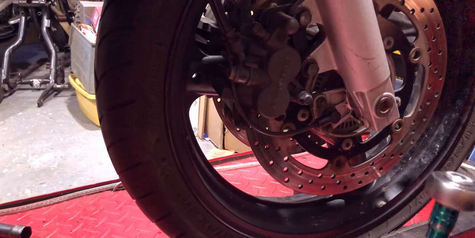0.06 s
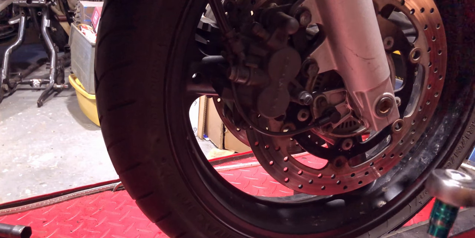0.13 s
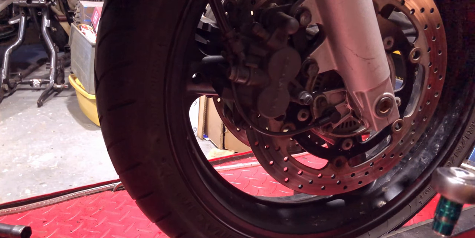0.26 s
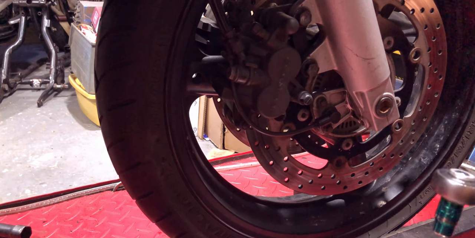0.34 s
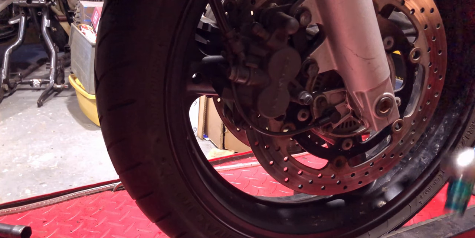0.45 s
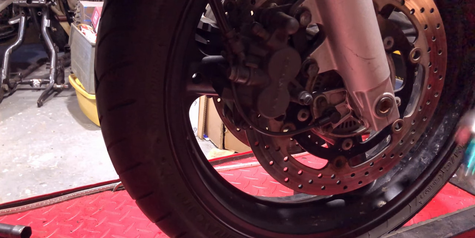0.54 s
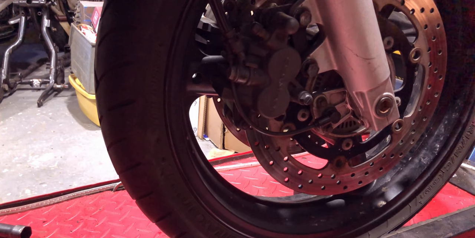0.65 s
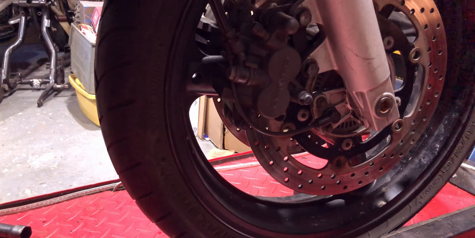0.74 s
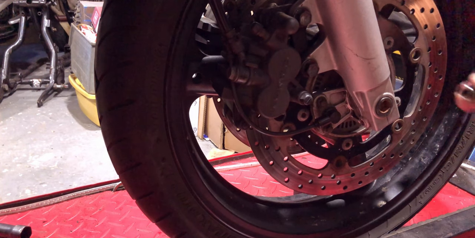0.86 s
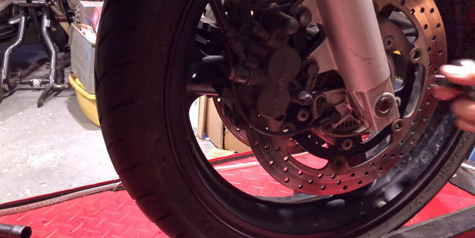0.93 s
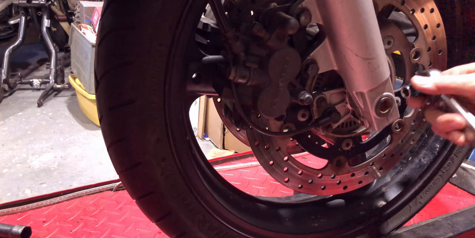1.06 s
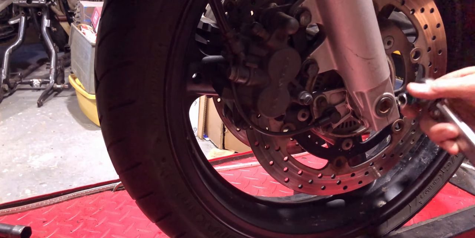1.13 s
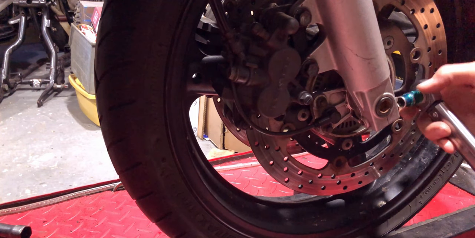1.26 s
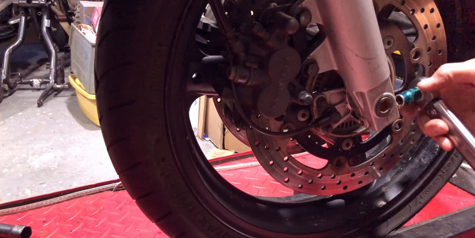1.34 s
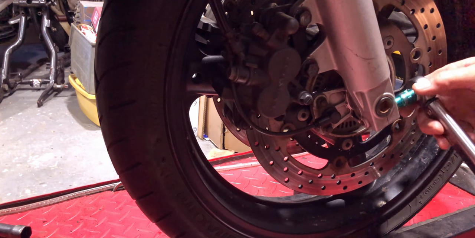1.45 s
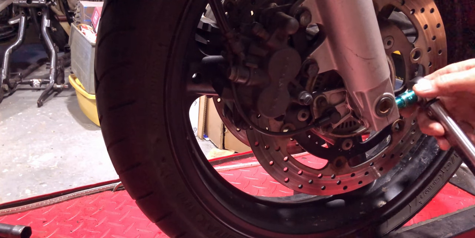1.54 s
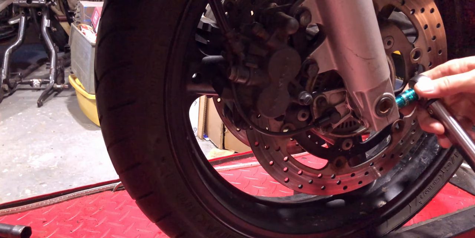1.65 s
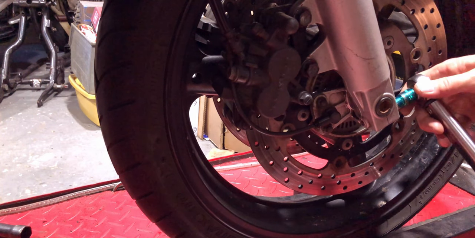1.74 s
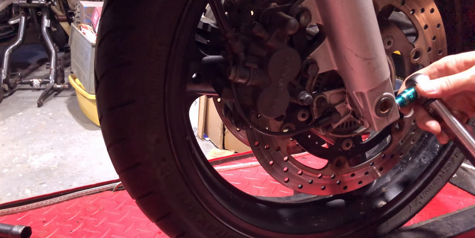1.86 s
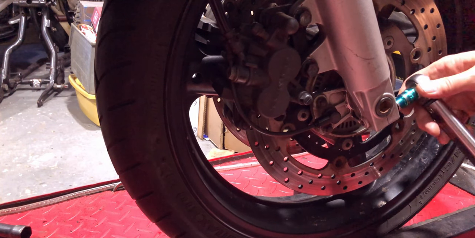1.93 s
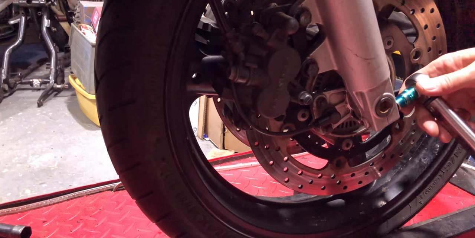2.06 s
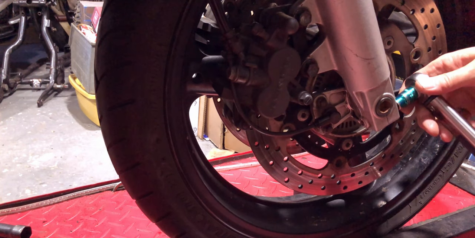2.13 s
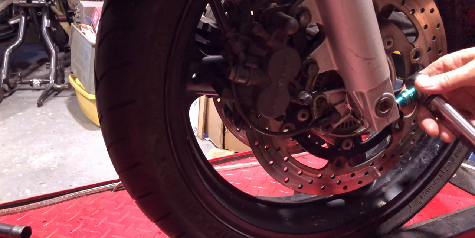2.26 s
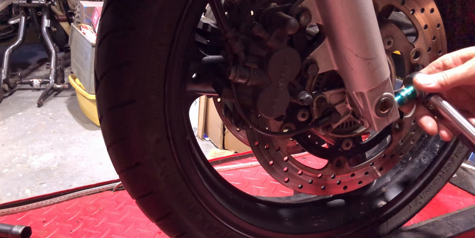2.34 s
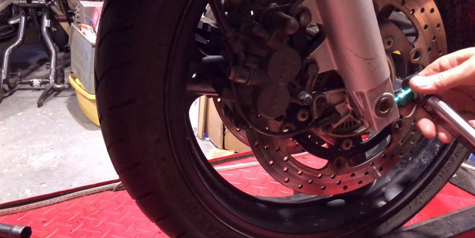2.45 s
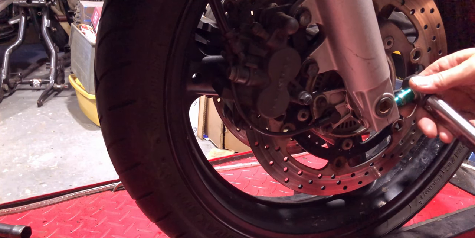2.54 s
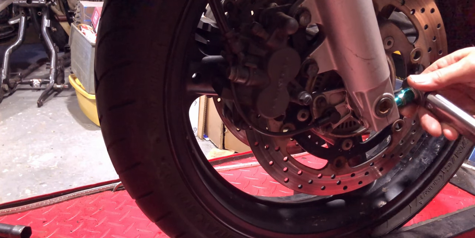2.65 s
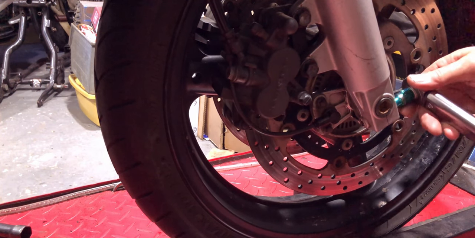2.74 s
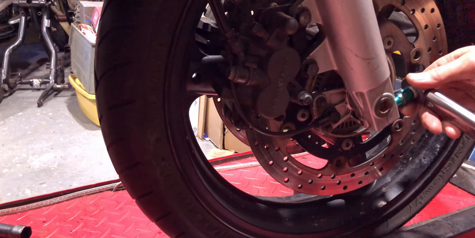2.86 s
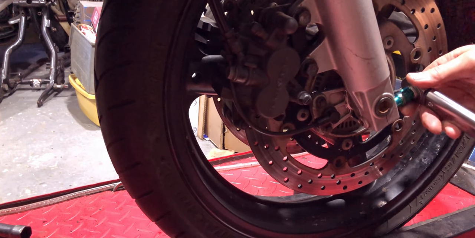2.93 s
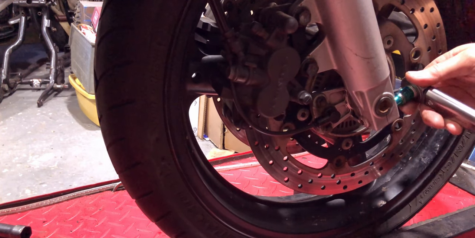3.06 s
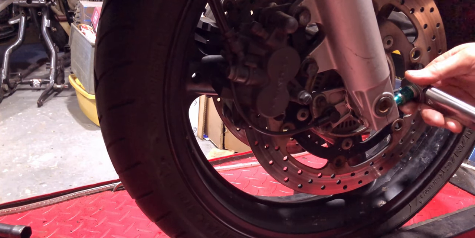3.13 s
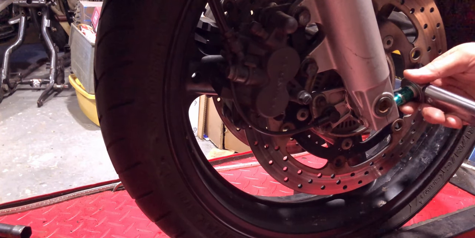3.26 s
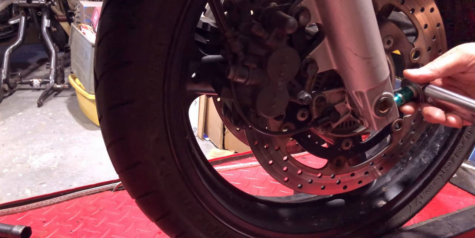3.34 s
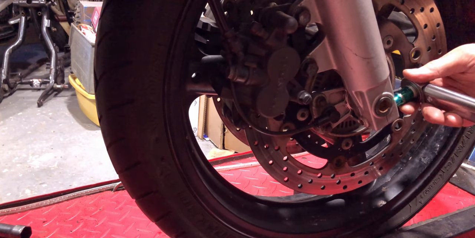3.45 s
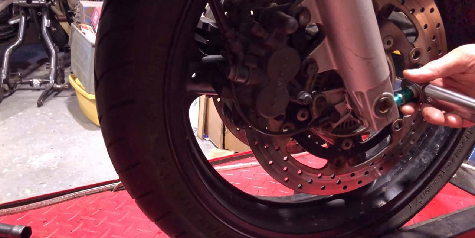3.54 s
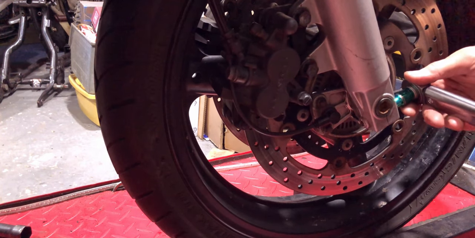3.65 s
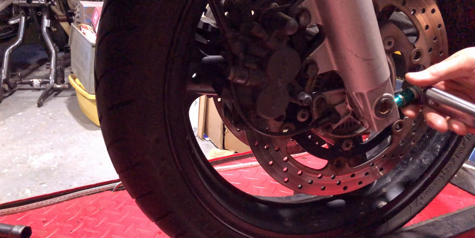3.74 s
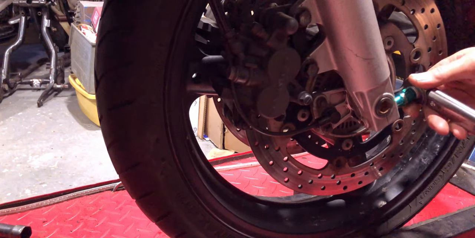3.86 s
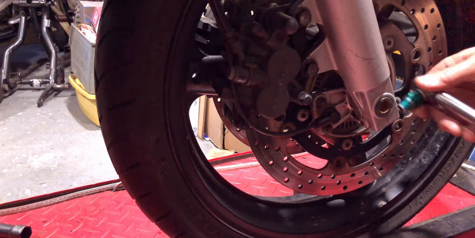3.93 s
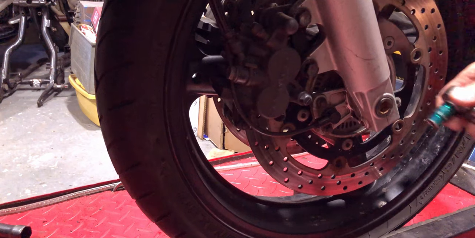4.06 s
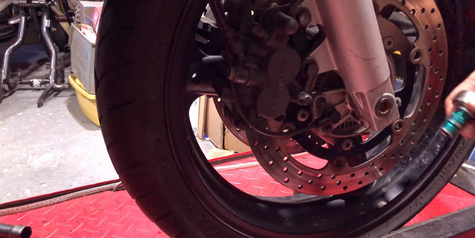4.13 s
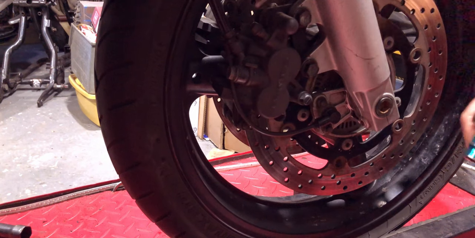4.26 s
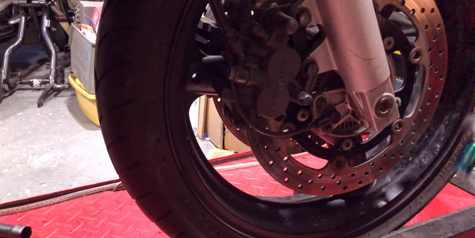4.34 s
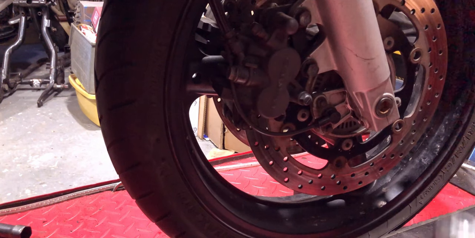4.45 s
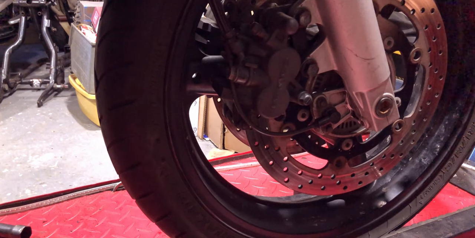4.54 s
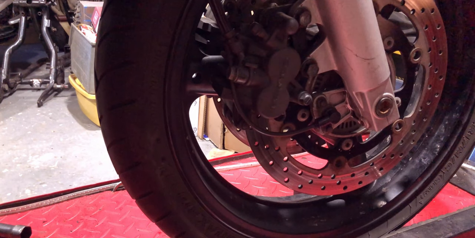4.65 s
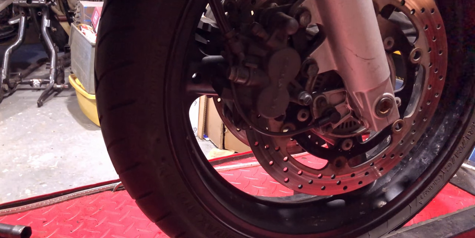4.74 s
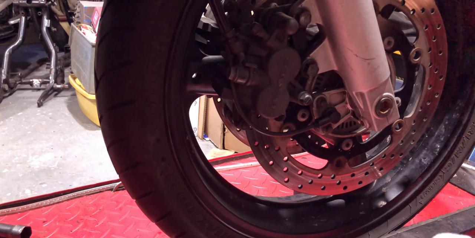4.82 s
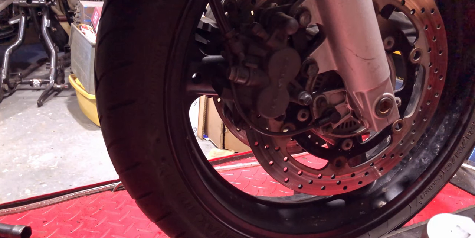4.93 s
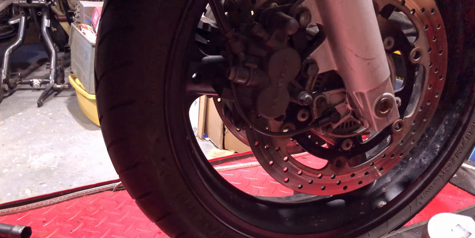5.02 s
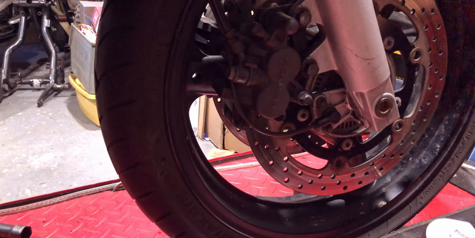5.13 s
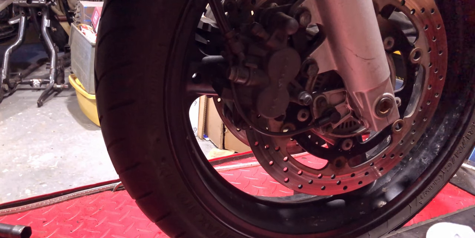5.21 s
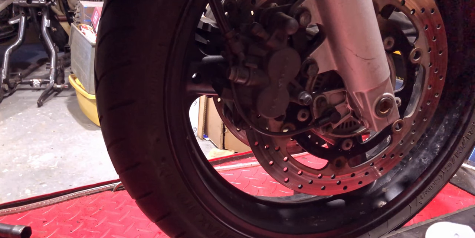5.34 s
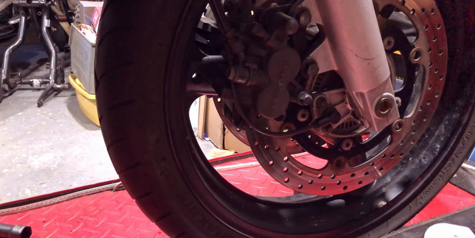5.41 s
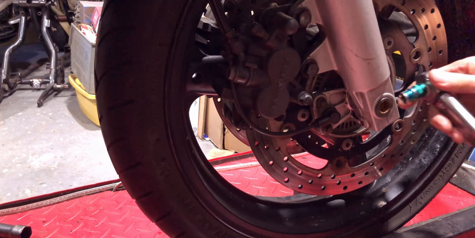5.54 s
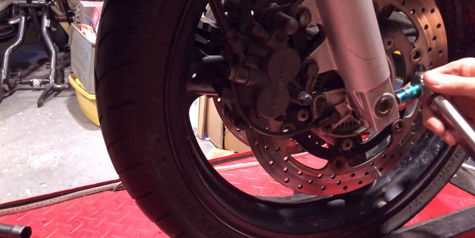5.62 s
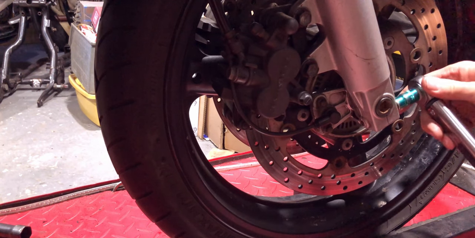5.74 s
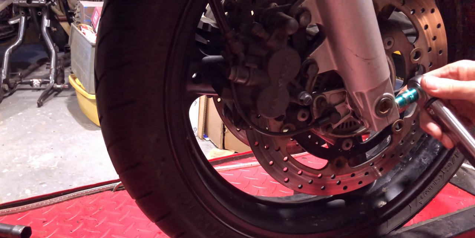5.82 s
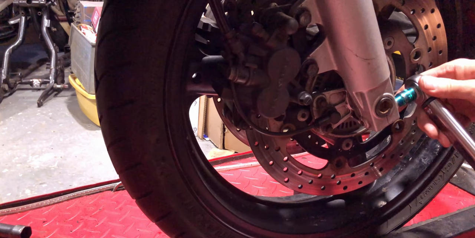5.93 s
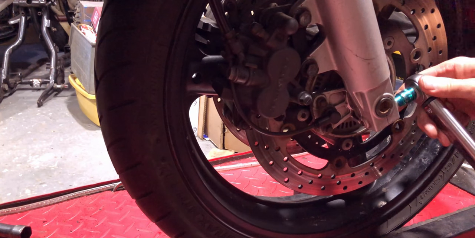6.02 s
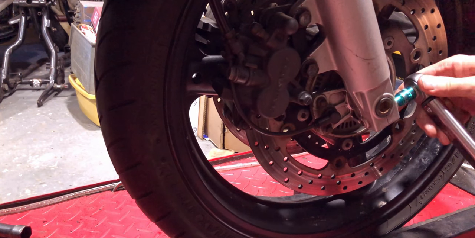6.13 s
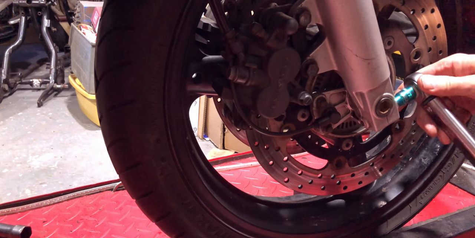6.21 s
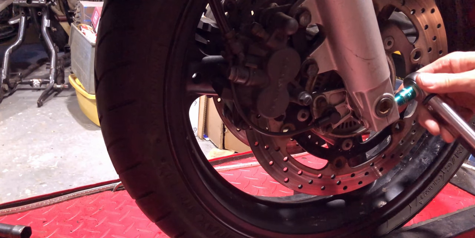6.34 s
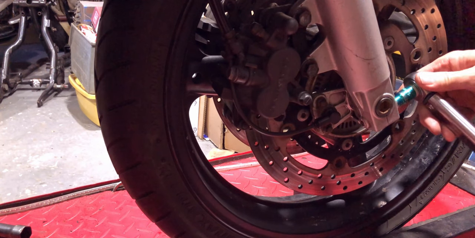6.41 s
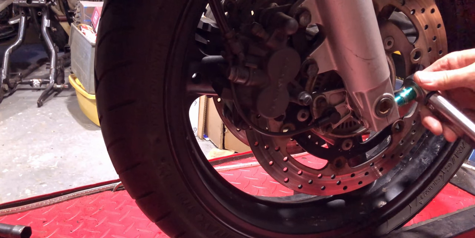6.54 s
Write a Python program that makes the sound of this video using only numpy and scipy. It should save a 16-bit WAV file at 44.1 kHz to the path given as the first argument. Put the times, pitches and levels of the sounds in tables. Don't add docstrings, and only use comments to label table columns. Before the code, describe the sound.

A torque wrench socket taps and scrapes onto a motorcycle fork bolt, then gives three sharp steel clicks in a small garage, close up.

```python
import sys
import numpy as np
from scipy import signal
from scipy.fft import rfft, irfft
from scipy.io import wavfile
from scipy.ndimage import uniform_filter1d

SR = 44100
rng = np.random.default_rng(int(sys.argv[2]) if len(sys.argv) > 2 else 0)


def wav_out(sig):
    wavfile.write(sys.argv[1], SR, np.round(np.clip(np.atleast_2d(sig).T, -1, 1) * 32767).astype(np.int16))


def undo_db(level):
    steps = np.asarray(level, float) / 20
    return 10 ** steps


N = 290125

# pitch_hz [Hz], level_db [dB], t60_s [s]
FORK_MODES = [(480, -12.5, 0.065), (794, -13.5, 0.06), (1120, 0, 0.027), (1370, -6.5, 0.019),
              (1760, -2.5, 0.021), (1950, -3.5, 0.0096), (2766, -6, 0.013), (3480, -8, .012),
              (4300, -12.5, 0.0072), (5640, -11.5, 0.011)]
# pitch_hz [Hz], level_db [dB], t60_s [s]
THUMP_MODES = [(239, -26, 0.32), (260, -13.5, 0.078), (344, -9, .06), (403, -3.5, 0.036), (442, 3.5, .04),
               (827, -6, .04), (1160, 0.5, 0.042)]


def level(x, db):
    return x * undo_db(db) / np.sqrt(np.mean(x ** 2))


def peak(x, db):
    return x * undo_db(db) / np.max(np.abs(x))


def band(x, lo_hz, hi_hz):
    edges = [lo_hz, min(hi_hz, 0.45 * SR)]
    return signal.sosfilt(signal.butter(2, edges, "bandpass", fs=SR, output="sos"), x)


def colour(x, points):
    hz, db = np.transpose(points)
    f = np.fft.rfftfreq(len(x), 1 / SR)
    gain = undo_db(np.interp(np.log(f + 1), np.log(hz), db))
    return irfft(rfft(x) * gain, len(x))


def add(track, s, sound):
    i = int(s * SR)
    track[i:i + len(sound)] += sound[:N - i]


def walk(rate):
    hold = int(SR / rate)
    steps = rng.standard_normal(999)[np.arange(N) // hold]
    return 1.2 * uniform_filter1d(steps, hold)


def strokes(rows, edge_s):
    t = np.arange(N) / SR
    start_s, length_s, level_db, change_db = np.array(rows)[:, :4].T[:, :, None]
    inside_s = np.minimum(t - start_s, start_s + length_s - t)
    edges = np.clip(inside_s / edge_s + 0.5, 0, 1)
    progress = np.clip((t - start_s) / length_s, 0, 1)
    return edges * undo_db(level_db + change_db * (progress - 0.5))


def ring(modes, phase):
    t = np.arange(SR) / SR
    if max(m[2] for m in modes) < 0.1:
        t = t[:SR // 10]
    hz, db, t60 = np.array(modes, float).T[:, :, None]
    tones = np.sin(2 * np.pi * (hz * t + phase[:, None]))
    decay = np.exp(-np.log(1000) * t / t60)
    out = np.sum(undo_db(db) * tones * decay, axis=0)
    return out / np.max(np.abs(out))


def strike(modes, ms, crowd, crowd_db, fade_ms):
    t_ms = np.arange(len(crowd)) / SR * 1000
    chatter = 0.45 * rng.standard_normal(len(t_ms)) * np.exp(-(t_ms / ms) ** 2)
    chatter[0] = 1.6
    response = ring(modes, rng.random(len(modes)))[:len(t_ms)]
    clear = signal.fftconvolve(chatter, response)[:len(t_ms)]
    flare = np.sqrt(signal.lfilter([1], [1, -0.9], chatter ** 2))
    crowd = crowd * (flare + 0.22 * np.exp(-t_ms / fade_ms))
    return peak(clear, 0) + peak(crowd, crowd_db)


def garage():
    # centre_hz [Hz], level_db [dB], t60_s [s]
    tail_bands = [(246, -0.5, 0.46), (500, 0.5, 0.27), (1000, 2, 0.19), (2000, 1, 0.13), (4000, -4.5, 0.25),
                  (8000, -1.5, 0.19), (13400, 3.5, 0.053)]
    t = np.arange(SR // 2) / SR
    tail = np.zeros(len(t))
    for hz, db, t60 in tail_bands:
        noise = level(band(rng.standard_normal(len(t)), hz / 1.42, hz * 1.42), 0)
        tail += undo_db(db) * noise * np.sqrt(hz / t60) * np.exp(-np.log(1000) * t / t60)
    return tail * (1 - np.exp(-t / 0.00033))


def echo(hit, all_round, db, direct_db):
    tail = np.zeros(SR // 2)
    for source, source_db in ((all_round, 0), (hit, direct_db)):
        feed = level(source, source_db) / np.sqrt(len(source))
        tail += signal.fftconvolve(garage(), feed)[:SR // 2]
    return level(tail, db) * np.sqrt(np.sum(hit ** 2) / len(tail))


def floor():
    # time_s [s], level_db [dB]
    traffic = [(0.0, -66), (0.2, -67), (0.64, -70), (1.48, -67), (2.34, -64.5), (2.58, -61), (3.32, -63.5),
               (3.52, -69), (3.94, -62), (4.18, -65.5), (4.65, -53.5), (5.0, -62.5), (5.33, -59.5),
               (5.73, -63), (6.12, -57.5), (6.58, -56.5)]
    # pitch_hz [Hz], level_db [dB]
    hiss_colour = [(15, -20), (22, -6.5), (40, -1), (75, -4), (130, -10.5), (165, -21.5), (215, -15),
                   (320, -24), (480, -29.5), (1000, -33.5), (2500, -37), (6000, -37), (14300, -36.5),
                   (16000, -46.5)]
    floor_db = -63
    steady = colour(rng.standard_normal(N), hiss_colour)
    swell_db = np.interp(np.arange(N) / SR, *np.transpose(traffic))
    deep = level(band(rng.standard_normal(N), 61, 120), -3.5)
    deep *= undo_db(swell_db + 1.8 * walk(8))
    low = level(band(band(rng.standard_normal(N), 81, 240), 81, 240), -9.5)
    low *= undo_db(swell_db + 3.5 * walk(8.9))
    return level(steady, floor_db - 0.5) + deep + low


def sleeve():
    # start_s [s], length_s [s], level_db [dB], change_db over the stroke [dB], crisp_db [dB]
    rustles = [(0.692, .08, -68, -4, 2.5), (0.791, 0.113, -72, 9, 2), (0.916, 0.046, -74.5, -.5, -15),
               (0.982, 0.023, -58, -2, -4.5), (1.017, 0.042, -59, -.5, -1.5),
               (1.061, 0.13, -66, -7.5, -9.5), (2.787, .06, -64, 12, -3.5), (2.85, 0.049, -75.5, -1.5, -5),
               (4.044, .16, -68.5, 3.5, 1), (4.208, .165, -63.5, .8, 3.77), (4.495, 0.091, -79.5, -1.5, -4),
               (4.581, 0.031, -55, -3.5, 4.3), (4.618, 0.12, -73.5, -0.5, -3), (4.76, 0.022, -66, -4, -1),
               (4.792, 0.0792, -76, -1, -3), (5.578, .07, -66, 0, .8), (5.655, 0.1115, -73.5, -6, -2)]
    edge_s, top_db, low_db = 0.017, -5, -5
    fibres = rng.standard_normal(N) * undo_db(1.6 * rng.exponential(size=N))

    def cloth(lo_hz, hi_hz):
        return level(band(band(fibres, lo_hz, hi_hz), lo_hz, hi_hz), 0) * undo_db(1.5 * walk(40))

    mid, top, low = cloth(3530, 9700), cloth(10600, 24000), cloth(1500, 5240)
    gains, crisp_db = strokes(rustles, edge_s), np.array(rustles)[:, -1]
    top_gain = undo_db(top_db + crisp_db) @ gains
    low_gain = undo_db(low_db - 0.3 * crisp_db) @ gains
    return mid * gains.sum(axis=0) + top * top_gain + low * low_gain


def disc():
    # pitch_hz [Hz], level_db [dB], t60_s [s]
    disc_modes = [(2027, -1, .8), (2115, -2, .8), (2750, -3, .4), (3653, 0.5, 1.9), (3657, -6.5, 0.83)]
    return ring(disc_modes, np.array([0, 0.5, 0, 0, 0.5]))


def taps():
    # start_s [s], peak_db [dB], contact cutoff_hz [Hz], rattle_ms [ms], disc_db [dB]
    knocks = [(1.2925, -20.5, 4000, 4, -34.5), (1.4925, -32, 2040, 2.1, -26.5),
              (1.535, -26, 2300, 8.3, -44.5), (1.720, -43.5, 1200, 8.7, -37.5),
              (1.8705, -30.5, 2040, 6.6, -40), (2.411, -40.5, 5030, 2.6, -42.5),
              (2.421, -40, 4000, 6.5, -41), (2.477, -16.5, 3780, 3.34, -39), (2.7083, -31, 2000, 1, -45.5),
              (3.0915, -40, 7000, .4, -65), (3.976, -43, 4915, 5.8, -51.5), (3.985, -41, 1500, 4.7, -55.5),
              (5.798, -38, 2480, 3.9, -46.5), (5.8885, -39.5, 1593, 4, -50), (5.9485, -34, 2660, 1.4, -44)]
    # start_s [s], peak_db [dB], contact cutoff_hz [Hz]
    touches = [(.741, -59, 3000), (0.862, -55, 9000), (0.903, -53, 2200), (1.867, -40.5, 1200),
               (1.93, -61.5, 6000), (2.005, -54, 1500), (2.079, -55, 1500), (2.119, -57.5, 1000),
               (2.397, -57, 1200), (2.431, -48.5, 5000), (2.687, -53, 2000), (3.009, -62.5, 900),
               (3.611, -68.5, 4000), (3.71, -54, 5000), (3.725, -60, 5000), (4.064, -59, 2500),
               (5.838, -53.5, 3000), (5.943, -47, 2000), (6.20, -60.5, 1102)]
    rattle_cycles, touch_disc_db = 4.4, -43
    thump_db = -21
    out, pulse = np.zeros(N), np.eye(1024)[0]
    body = ring([mode for mode in THUMP_MODES if mode[0] < 500], np.zeros(1))
    ticks = [(s, db, hz, rattle_cycles / hz * 1e3, touch_disc_db) for s, db, hz in touches]
    for s, db, hz, ms, disc_db in sorted(knocks + ticks):
        modes = []
        for (f, gain_db, t60), (detune, grip) in zip(FORK_MODES, rng.standard_normal((len(FORK_MODES), 2))):
            modes.append((f * (1 + 0.02 * detune), gain_db + 1.5 * grip, t60))
        edges = min(0.25 * hz, 3000), max(hz, 800)
        blow = strike(modes, max(ms, 0.3), rng.standard_normal(SR // 10), 11.0, 6.0)
        hit = peak(band(blow, *edges), db)
        add(out, s, hit)
        add(out, s, echo(hit, band(pulse, *edges), -6.5, -1.2))
        add(out, s + 0.0018, undo_db(db + thump_db) * body)
        add(out, s, undo_db(db + disc_db) * disc())
    return out


def scrape():
    # start_s [s], length_s [s], level_db [dB], change_db over the slide [dB]
    slides = [(1.438, 0.046, -55, 7), (1.70, 0.097, -74, -15), (1.85, 0.023, -62.5, 8),
              (1.90, 0.053, -67, -6), (1.975, 0.049, -65.5, -3), (2.39, 0.045, -56, 15),
              (2.425, 0.045, -59.5, 9), (2.67, 0.04, -63.5, 25), (3.968, 0.0283, -56.5, -6.5),
              (5.808, .012, -53.5, -18), (5.83, 0.021, -68, -9), (5.90, 0.032, -57.5, -9),
              (6.0, .035, -75, -10)]
    edge_s, grit_db = 0.009, -63
    grit_power = 0.3
    slips = rng.standard_normal(N) * undo_db(2.2 * rng.exponential(size=N)) * undo_db(2.5 * walk(150))
    fork = signal.fftconvolve(slips, ring(FORK_MODES, rng.random(len(FORK_MODES))))[:N]
    body = band(band(level(fork, -12.5) + level(slips, 4.2), 500, 2000), 500, 2000)
    grit = level(band(slips, 3000, 7000), grit_db)
    push = strokes(slides, edge_s).sum(axis=0)
    return level(body, -0.52) * push + grit * push ** grit_power


def clicks():
    # start_s [s], peak_db [dB], rattle_ms [ms], fork thump_db [dB], disc_db [dB]
    breaks = [
        (2.7101, -14.5, 2.27, -15, -44),
        (3.0929, 0, 4, -20, -58.5),
        (3.7709, -2.5, 5.6, -13.5, -82),
    ]
    # pitch_hz [Hz], width_hz [Hz], level_db [dB]
    wrench_modes = [
        [(2785, 630, -8.5), (3730, 66, -3), (5600, 42, -5.5), (5900, 390, 2), (7740, 67, 0), (9000, 92, -3.5),
         (9840, 240, -8.5), (12700, 65, -5.5), (15300, 120, -6.5), (15660, 46, -11)],
        [(1990, 93, -15.5), (3780, 110, 3), (5490, 170, -13), (6780, 66, -8.5), (7600, 91, -2), (8970, 76, -4),
         (11800, 130, -19.5), (11160, 220, -9.5), (12000, 87, -9.5), (13700, 36, 0.5), (15120, 120, -16.5),
         (15700, 70, -28)],
        [(2150, 48, -10.5), (3800, 110, -0.5), (4950, 33, -3), (5560, 60, 1), (6790, 210, -7.5),
         (7900, 170, -12.5), (8430, 74, 2.5), (10120, 160, -13), (11500, 130, -9.5), (13200, 540, -8.5),
         (14100, 67, -6.5), (14600, 90, -14)],
    ]
    # pitch_hz [Hz], level_db [dB]
    glints = [
        [(180, -51.5), (300, -19), (447, 0), (725, -20.5), (1140, -7.5), (1280, -23), (6520, -12),
         (10600, -21.5), (11500, -16.5), (16000, -24.5)],
        [(180, -30), (300, -1), (689, -15), (1120, -5.5), (1580, -17.5), (2030, -3), (3030, -6), (5340, -0.5),
         (14000, -6.5), (16000, -21)],
        [(180, -34.5), (300, 2.5), (462, -19.5), (842, -13.5), (1580, -15.5), (2250, -3.5), (3290, -18),
         (8790, -8.5), (14200, -14), (16000, -36)],
    ]
    # pitch_hz [Hz], level_db [dB], t60_s [s]
    wheel_modes = [(202, -0.15, .6), (207, -1.3, .6)]
    wheel_db, room_db = -32, -10
    out, t = np.zeros(N), np.arange(SR) / SR
    pulse = np.eye(512)[64]
    for (s, db, ms, thump_db, disc_db), peaks, glint in zip(breaks, wrench_modes, glints):
        tube = [(hz, gain_db, 0.85 / width) for hz, width, gain_db in peaks]
        crowd = band(colour(rng.standard_normal(SR // 10), glint), 900, 19000)
        hit = peak(strike(tube, ms, crowd, -1.5, 8.5), db)
        add(out, s, hit)
        add(out, s, echo(hit, colour(pulse, glint), room_db, -6))
        thump = ring(THUMP_MODES, rng.random(len(THUMP_MODES))) * (1 - np.exp(-t / 0.0012))
        add(out, s + 0.0011, undo_db(db + thump_db) * thump)
        wheel = ring(wheel_modes, np.arange(2) / 2)
        add(out, s, undo_db(db + thump_db + wheel_db) * wheel)
        add(out, s, undo_db(db + disc_db) * disc())
    return out


def scene():
    return (floor() + sleeve() + taps() + scrape() + clicks())[None]


def low_pass(x):
    return signal.sosfilt(signal.butter(12, 16600, fs=SR, output="sos"), x)


def record(dry):
    heard = signal.sosfilt(signal.butter(8, 15600, fs=SR, output="sos"), dry)
    offset = -0.0014
    return low_pass(np.clip(heard + offset, -1, 1))


dry = scene()
out = record(dry)
wav_out(out)
```